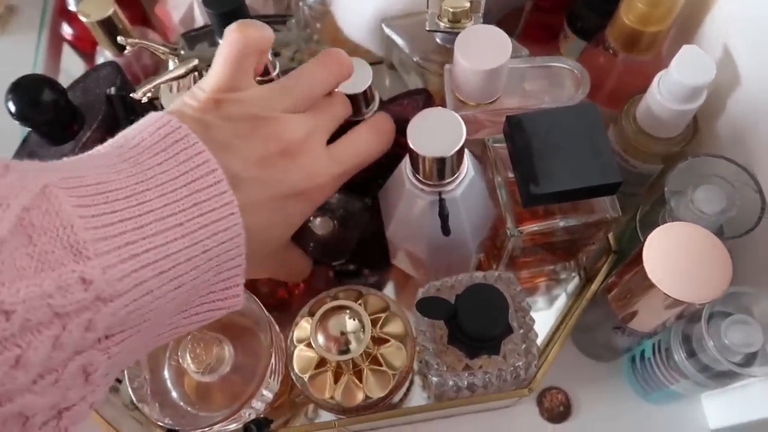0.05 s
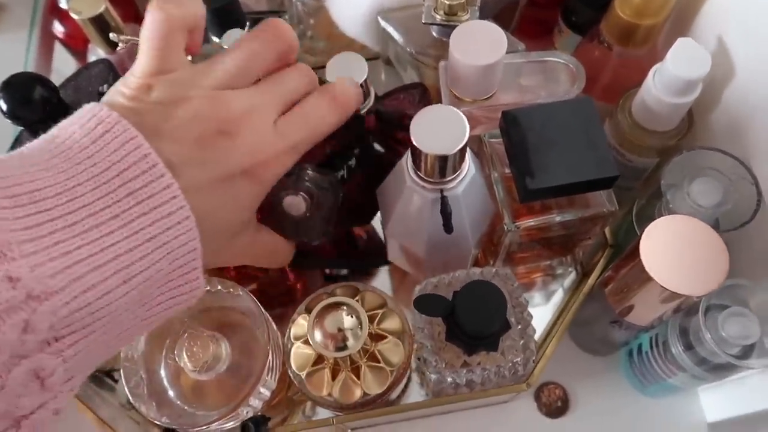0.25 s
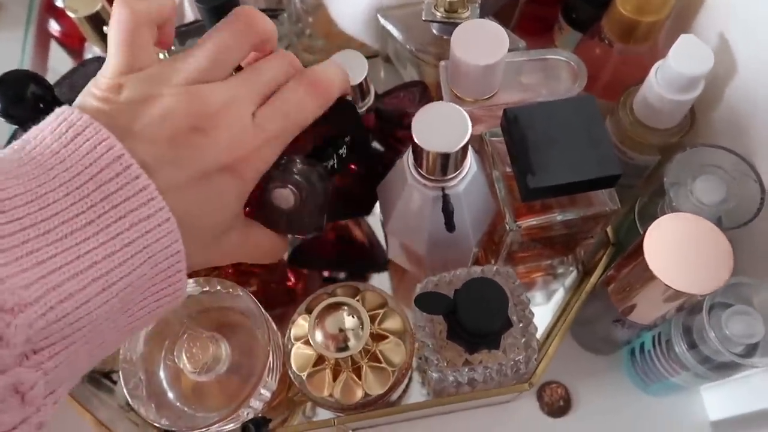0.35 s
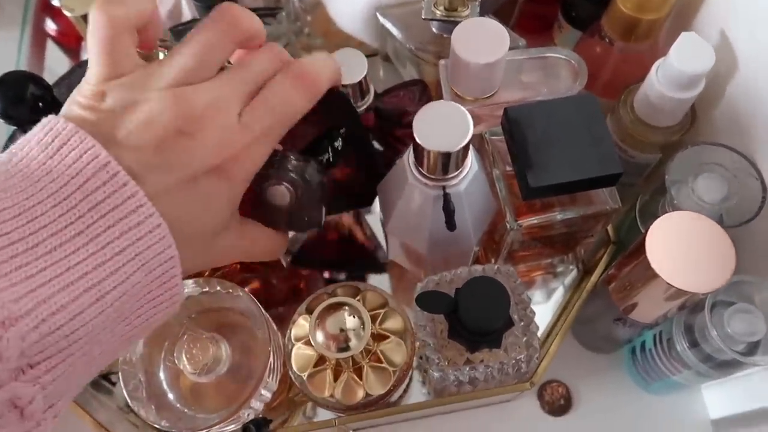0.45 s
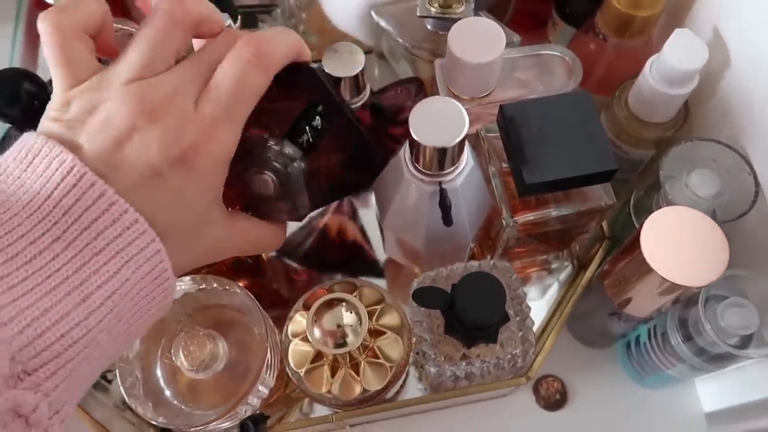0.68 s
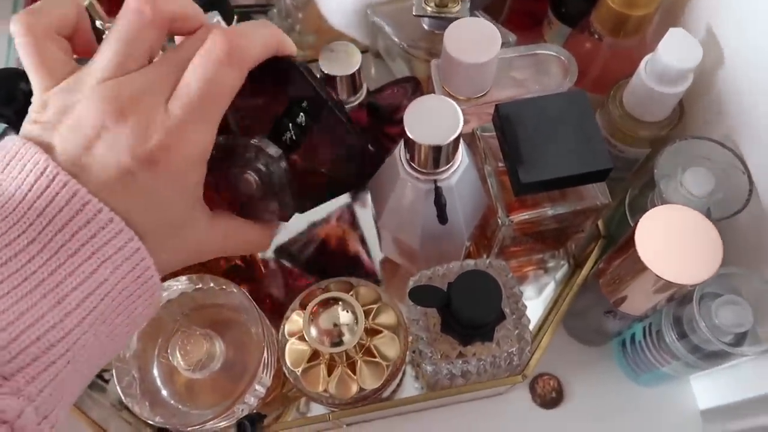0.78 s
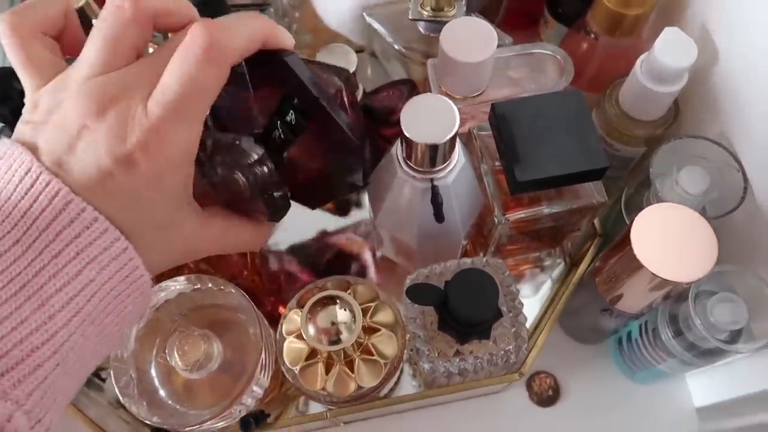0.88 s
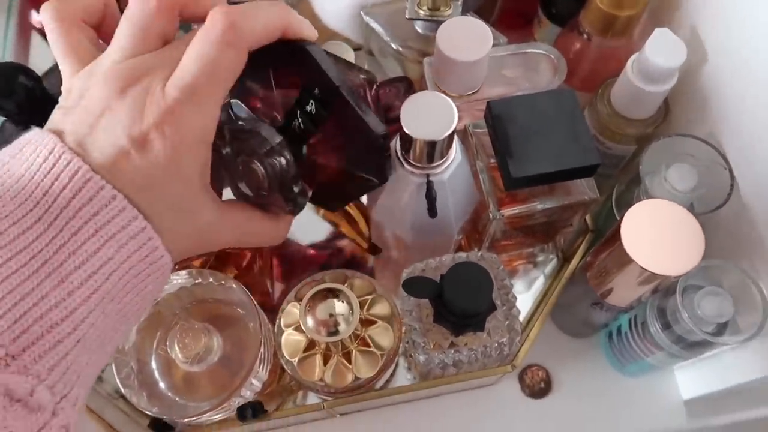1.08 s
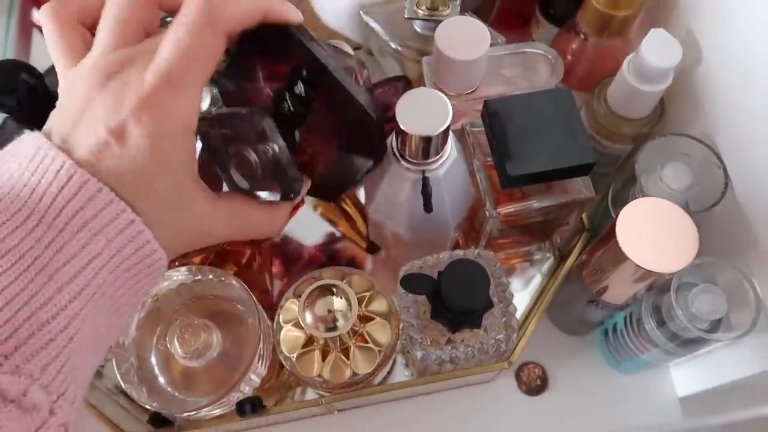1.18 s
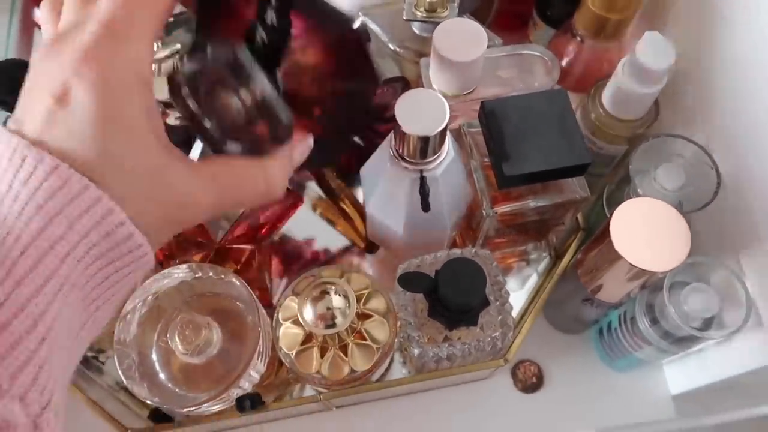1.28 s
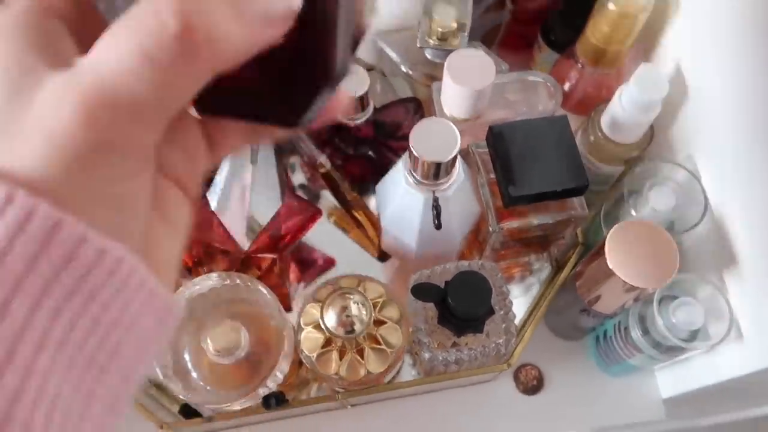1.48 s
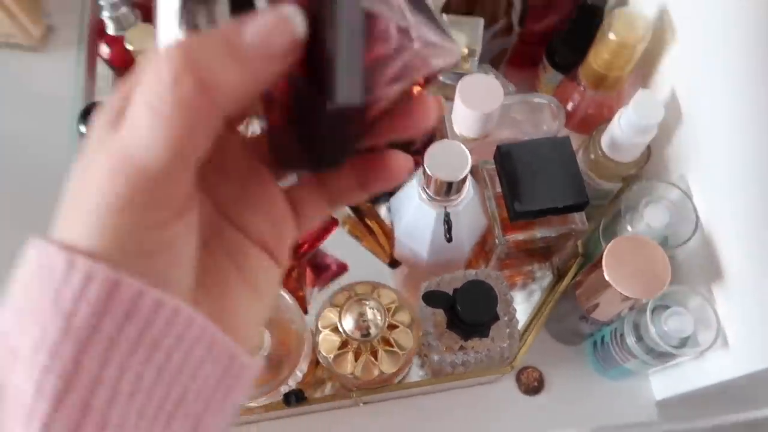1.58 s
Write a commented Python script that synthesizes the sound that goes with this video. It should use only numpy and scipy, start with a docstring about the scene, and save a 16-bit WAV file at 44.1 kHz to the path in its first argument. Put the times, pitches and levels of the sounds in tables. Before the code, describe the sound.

Close-up glass clinks and solid clacks come in irregular bursts as a bottle is pulled from among others, with low tray rumble and short sliding, then a short room tail and near quiet.

```python
"""Thick glass bottles knock together on a crowded glass tray, close to a small microphone in a bare room.
Each contact sums damped tray and bottle modes with a short noisy crack; some set thin high glass tones ringing.
Coloured noise makes the bottles' uneven slide, the low tray rumble, a wavering hum and the room air.
Contacts and glass tones excite noise-made room tails; the microphone thins the bass and rounds off peaks."""
import sys
import numpy as np
from scipy import signal
from scipy.fft import rfft, irfft, next_fast_len
from scipy.io import wavfile
from scipy.ndimage import map_coordinates

SR = 44100
rng = np.random.default_rng(int(sys.argv[2]) if len(sys.argv) > 2 else 0)


def transcribe(u):
    """Save the signal u as a 16-bit wav file named by the first command-line argument.

    u: samples, shape (n,) or (channels, n), limited to [-1, 1]; the rate is SR.
    q: integer samples, one column per channel.
    """
    v = np.clip(np.atleast_2d(u).T, -1, 1)
    q = np.round(v * 32767).astype(np.int16)
    wavfile.write(sys.argv[1], SR, q)


N = 72765  # samples, 1.65 s


def amp(db):
    """dB to gain."""
    return 10 ** (np.asarray(db) / 20)


def unit(x):
    """Scaled to rms 1."""
    return x / np.sqrt(np.mean(x ** 2) + 1e-20)


def along(points, hz):
    """Values of (f/Hz, value) points, read along a log frequency axis."""
    f, v = np.transpose(points)
    return np.interp(np.log(hz + 1), np.log(f + 1), v)


def curve(rows):
    """A (t/s, level/dB) table as a gain per sample, dying away within 50 ms of its end."""
    s, db = np.transpose(rows)
    times = [*s, s[-1] + .05]
    return amp(np.interp(np.arange(N) / SR, times, [*db, -120]))


def filtered(x, response):
    """x with its spectrum multiplied by a response of frequency."""
    m = next_fast_len(x.shape[-1] + SR // 4)
    spectrum = rfft(x, m) * response(np.fft.rfftfreq(m, 1 / SR))
    return irfft(spectrum, m)[..., :x.shape[-1]]


def low_cut(x, corner_hz):
    """Second-order bass loss below a corner."""
    return filtered(x, lambda hz: (1j * hz / (corner_hz + 1j * hz)) ** 2)


# Diffuse sound at the microphone: f/Hz, left-right likeness (1 = identical)
LIKENESS = [(40, .94), (100, 1), (500, 1), (1500, 0.99), (3000, 0.9), (6000, .3), (12000, .05)]


def spread(pair):
    """Two unrelated signals mixed to a left and right that agree at low frequencies and part in the treble."""
    def mid_side_gains(hz):
        turn = np.arccos(np.clip(along(LIKENESS, hz), -1, 1)) / 2
        return np.array([np.cos(turn), np.sin(turn)])

    mid, side = filtered(pair, mid_side_gains)
    return np.array([mid + side, mid - side])


def hiss(spectrum):
    """Stereo noise of rms 1 with a given colour, fading out below its lowest point."""
    shut = [(spectrum[0][0] / 2, -70), *spectrum]
    noise = rng.standard_normal((2, N))
    return unit(spread(filtered(noise, lambda hz: amp(along(shut, hz)))))


def ring(hz, db, t60, t):
    """Damped modes of alternating sign, struck once."""
    hz, db, t60 = np.array([hz, db, t60])[:, :, None]
    sign = (-1) ** np.arange(len(hz))[:, None]
    return np.sum(sign * amp(db - 60 * t / t60) * np.sin(2 * np.pi * hz * t), axis=0)


# Bottles sliding, before lift and unevenness: t/s, level/dB
SLIDE_LEVEL = [(0.0, -41.5), (0.282, -46.5), (0.476, -39.5), (0.718, -56.5), (0.87, -41.5), (0.96, -36),
               (1.04, -34)]
# Colour of the scrape: f/Hz, relative level/dB
SLIDE_COLOUR = [(88, -40), (150, -7.5), (505, -6), (687, -2), (991, -3), (1770, -5), (5510, -27.5),
                (11700, -38), (15000, -69)]
SLIDE_LIFT_DB, GRIT_DB = 0.5, 3.5  # over the level curve; strength of the unevenness


def slide():
    """Bottle feet scraping over the tray, their noise varied by a smooth random grit of 200 points a second."""
    grit = map_coordinates(rng.standard_normal(400), [np.arange(N) * 200 / SR])
    return amp(SLIDE_LIFT_DB + GRIT_DB * grit) * curve(SLIDE_LEVEL) * hiss(SLIDE_COLOUR)


# Tray rumble: t/s, level/dB
RUMBLE_LEVEL = [(0.0, -43), (0.064, -46.5), (0.128, -57), (0.362, -40), (0.496, -41.5), (0.574, -35),
                (0.72, -51), (0.758, -37), (0.798, -48.5), (0.882, -55.5), (0.922, -29.5), (1.01, -48),
                (1.046, -37), (1.09, -47), (1.172, -50), (1.406, -67.5), (1.65, -63)]
# Colour of the rumble: f/Hz, relative level/dB
RUMBLE_COLOUR = [(22, -9), (40, -13), (60, -17.5), (100, 0.4), (130, 1.5), (180, -2), (250, -8), (500, -54)]


def tray_rumble():
    """Low noise of the tray, swelling and sinking."""
    return curve(RUMBLE_LEVEL) * hiss(RUMBLE_COLOUR)


# Low wavering hum: t/s, level/dB
HUM_LEVEL = [(0.0, -33.5), (0.032, -52), (0.16, -51), (0.202, -42.5), (0.234, -48.5), (0.266, -28),
             (0.298, -54), (0.458, -40), (0.472, -53), (0.578, -34.5), (0.62, -64), (0.844, -61),
             (0.914, -53), (1.158, -64), (1.216, -57), (1.442, -62), (1.498, -50), (1.65, -54)]
# Colour of the hum, a narrow band: f/Hz, relative level/dB
HUM_COLOUR = [(50, -24), (64, -11), (72, -2.5), (80, -19), (100, -28.5), (200, -71)]


def hum():
    """A narrow band of low noise, which wavers like an unsteady tone."""
    return curve(HUM_LEVEL) * hiss(HUM_COLOUR)


# Colour of the room air: f/Hz, relative level/dB
AIR_COLOUR = [(120, -26), (200, -11), (400, -16), (1000, -20.5), (2500, -26), (5000, -31.5), (12000, -41)]
AIR_DB = -69


def room_air():
    """Steady faint noise, falling off towards the treble."""
    return amp(AIR_DB) * hiss([*AIR_COLOUR, (14000, -71.5)])


# Contacts, and a few early reflections some 10 ms after a hit: t/s, level/dB, ten colour levels/dB at COLOUR_HZ,
# rise time constant/ms, ring length as a factor on the mode and crack decays (under 1 shorter, over 1 longer)
KNOCKS = [(0.045, -25, -20, 2.5, -22, -15.5, -8, -14, -30.5, -14.5, -16, -43.5, 1.1, .9),
          (0.096, -20.5, -32.5, -19, -16.5, -23, -2.5, -11, -7, -20, -33, -44, 0.83, 1.2),
          (0.16, -18, -43.5, -14, -30.5, -18, -10.5, -12.5, -6, -10, -46.5, -61, 1.6, 1.2),
          (0.205, -30.5, -24, -32.5, -5, -8, -12, -2, 0, -5.5, -17.5, -29.5, 2.2, .7),
          (0.229, -10, -42, -26, -19.5, -5, -1.5, -16.5, -14.5, -20, -38.5, -51, 2.1, .7),
          (0.238, -18, -15, -11.5, -21.5, -19, -17.5, -36.5, -29, -14, -29, -49.5, 2.7, .9),
          (0.274, -19.5, -28.5, -19.5, -21.5, -17, -10.5, -12, -10.5, -21, -27, -34, 1.5, .9),
          (0.287, -29, -32.5, -34.5, -23, -14, -5.5, -20.5, -6.5, -3.5, -27, -42, 2.1, .9),
          (0.303, -8.5, -41, -28.5, -27.5, -4, -5.5, -15, -8.5, -15.5, -30.5, -50.5, 1.5, .9),
          (0.311, -6.5, -22, -8, -20.5, -15.5, -7.5, -8.5, -12.5, -13, -33, -43, 8, .9),
          (0.319, -21.5, -26.5, -20, -24.5, -17, -0.5, -13, -12, -16, -30.5, -42, 1.3, .9),
          (0.336, -9.5, -21.5, -11, -20.5, -6, -10.5, -13, -16.5, -16.5, -31, -41, 3.2, .9),
          (0.354, -3.5, -22.5, -15, -19.5, -13, -16.5, -9, -8.5, -13, -24.5, -39.5, 2.3, .9),
          (0.366, -12, -38, -28, -15.5, 5.5, -11, -6, -30.5, -30, -39, -46.5, 2, .9),
          (0.437, -13, -23.5, -16, -17, -17.5, -10, -21.5, -17, -21.5, -34.5, -54, 0.64, .9),
          (0.5135, -7, -36, -14, -11, -14, -6, -15, -8, -14, -21.5, -34.5, 3.1, 1.1),
          (0.52, -4, -33, -33, -27.5, -9, -16, -9, -8, -17.5, -31.5, -42, 2.9, .9),
          (0.531, -9, -3, -11, -16, -5.5, -12.5, -19, -10.5, -16.5, -32.5, -38, 1.2, .9),
          (0.547, -17.5, -21.5, -4.5, -5, 2.5, -8, -6.5, -11.5, -14.5, -17.5, -33.5, 3.5, 1.1),
          (0.567, -12.5, -31.5, -17.5, -9, -15, -15.5, -7, -1, -4, -26.5, -33.5, 2, .9),
          (0.571, 2.5, -33, -6, -6.5, -2, -16.5, -6, -13, -20, -19, -35.5, 0.2, .7),
          (0.58, -5.5, -35, -24, -24.5, -8, -8.5, -22, -16.5, -23, -37.5, -46, 0.62, .8),
          (0.729, -21.5, -28.5, -7, -16, -18.5, -3.5, -11, -8, -7, -16.5, -26.5, 4.3, 1.1),
          (0.749, -3, -41, -13, -12, -4.5, -18.5, -12, -9, -16.5, -27, -40, 4.9, .9),
          (0.806, -26, -26.5, -29, -22, -1.5, -20, -23, -24, -25.5, -41, -49.5, 3.5, 1.3),
          (0.891, -18, -32.5, -30.5, -25.5, -24, -22.5, -14, 7, -10, -20, -30, 1.1, .7),
          (0.908, -10, -28, -20.5, -23, -9.5, -1.5, -8.5, -3, -12.5, -20.5, -31, 6.5, 1.2),
          (0.9235, 2, -26, -10, -13.5, -9, -18, -9.5, -14.5, -15.5, -28, -39.5, 0.66, .7),
          (0.931, -9, -31, -22, -25, -9, -16, -6.5, -12, -17, -23, -36, 1.7, 1.1),
          (0.941, -13, -24, -21, -14, -16.5, -15.5, -5, -9.5, -15, -18, -33.5, 1.1, .9),
          (0.949, -17, -22.5, -24.5, -27, -18, -16, -13.5, -9, -16, -24.5, -38, .6, .6),
          (0.997, -18, -32.5, -27, -25.5, -20.5, -14, -8.5, -13, -27, -17.5, -40, 1.6, .9),
          (1.014, -27, -0.5, -14.5, -4.5, -6.5, -8, 10.5, 7, -2.5, -11.5, -20.5, 1.2, 1.2),
          (1.038, -15.5, -33, -23, -30.5, -10.5, -12.5, -10, -14.5, -11, -16, -21.5, 1, 1.1),
          (1.0435, 3.5, -18, -6, -5.5, -12, -7.5, -8.5, -8.5, -18, -20, -27.5, 0.39, .7),
          (1.0525, -6, -29, -20, -25, 0, -19, -23.5, -16.5, -17, -21.5, -27, 0.87, .9),
          (1.16, -22.5, -25.5, -14, -33, -18, -26, -6, -14.5, -16, -29, -51, 2.4, .9)]
# Where the colour levels sit: f/Hz
COLOUR_HZ = [190, 350, 530, 680, 830, 1300, 2000, 3200, 5500, 10000]
# Modes of tray and heavy bottles, before each row's colour and ring factor: f/Hz, level/dB, t60/s
BODY = [(230.8, -21.5, 0.0073), (314, 2.5, 0.019), (391.7, 7, 0.027), (497, 9, 0.02), (587, 3.5, 0.016),
        (707, -2, 0.048), (837.5, 6.5, 0.027), (960, -14, 0.0053), (1111, -1, 0.0073), (1211, 5, 0.02),
        (1372, 1, 0.016), (1667, -1, .022), (1926, -4.5, 0.04), (2190, 2, 0.016), (2520, -9.5, 0.026),
        (2767, -10, 0.054), (3030, 4, 0.021), (3740, -4, 0.03), (4263, -3.5, 0.03), (5060, -2, 0.015)]
SCATTER_DB, DETUNE = 1.5, .012  # random spread of each mode's level, and of its pitch as a fraction
CRACK_DB, CRACK_T60 = 7, 0.042  # noisy burst over the colour; its decay in s before the ring factor
CRACK_TILT_DB = 4.5  # brightening of the burst, nearing this much an octave well over 1 kHz
TREBLE_FALL_DB = -22.5  # at 16 kHz, under the 10 kHz colour
TRAY_DB = 40  # the whole tray shakes at each contact and fills the room evenly
BOTTLE_LOW_HZ = 110  # small bottles send out little below this


def knocks():
    """Each row rings the body modes and bursts into a noisy crack nearby, and sends a broad jolt to the room."""
    near, jolts = np.zeros(N + SR), np.zeros(N + SR)
    t = np.arange(SR // 10) / SR
    mode_hz, mode_db, t60 = np.transpose(BODY)
    impulse = np.arange(len(t)) == SR // 200  # 5 ms in
    for s, db, *colour, rise_ms, ring_factor in KNOCKS:
        start = round(s * SR)
        rise = 1 - np.exp(-1000 * t / max(rise_ms, .1))
        points = [(60, colour[0] - 40), *zip(COLOUR_HZ, colour), (16000, colour[-1] + TREBLE_FALL_DB)]

        def tint(hz):  # the colour, tilted down towards 3 dB an octave
            return amp(along(points, hz)) * np.sqrt(1000 / (hz + 100))

        def crack_colour(hz):
            return amp(CRACK_DB + CRACK_TILT_DB * np.log2(1 + hz / 1000)) * tint(hz)

        louder, higher = rng.standard_normal((2, len(BODY)))
        pitch = mode_hz * (1 + DETUNE * higher)
        level = mode_db + along(points, pitch) + SCATTER_DB * louder
        body = rise * ring(pitch, level, ring_factor * t60, t)
        burst = rise * amp(-60 * t / (ring_factor * CRACK_T60)) * rng.standard_normal(len(t))
        crack = filtered(burst, crack_colour)
        near[start:][:len(t)] += amp(db) * (body + crack)
        jolts[start:][:len(t)] += amp(db + TRAY_DB) * filtered(impulse, tint)
    return low_cut(near[:N], BOTTLE_LOW_HZ), jolts[:N]


# Side signal of the near sound: f/Hz, level under the mid/dB
CONTACT_SIDE = [(300, -25), (1000, -27), (3000, -11.5), (6000, -2.5), (12000, 3.5)]
SIDE_SMEAR_S, LEAN_DB = 0.0065, -0.5  # decay of the scatter; treble gain of the left, with the right opposite


def stereo(x):
    """Centred bass, treble scattered differently to each port by a random smear drawn afresh every 40 ms."""
    t, side, step = np.arange(SR // 50) / SR, np.zeros(N + SR), SR // 25
    for i in range(0, N, step):
        smear = rng.standard_normal(len(t)) * np.exp(-t / SIDE_SMEAR_S)
        part = signal.fftconvolve(x[i:i + step], smear / np.linalg.norm(smear))
        side[i:i + len(part)] += part
    side = filtered(side[:N], lambda hz: amp(along(CONTACT_SIDE, hz)))
    lean = lambda hz: amp(np.outer([1, -1], along([(1000, 0), (3000, LEAN_DB)], hz)))
    return filtered(np.array([x + side, x - side]), lean)


# Decay of the bare room: f/Hz, t60/s
ROOM_T60 = [(100, 0.83), (300, 0.29), (800, 0.64), (2000, 0.53), (5000, 0.45), (8000, 0.35), (11000, 0.1)]
# Colour of its answer, before the overall room level: f/Hz, level/dB
ROOM_COLOUR = [(100, -1.8), (300, -7.5), (800, -7), (2000, -7.5), (5000, -8.5), (10000, -3.5)]
ROOM_DB, NEAR_IN_ROOM_DB = -6.5, -8  # the whole answer; the near knocks sent into it


def room(x):
    """Each sixth of a second gets a freshly drawn noise tail, with its own decay at each frequency."""
    out, step = np.zeros((2, N + 2 * SR)), SR // 6
    for i in range(0, N, step):
        hz, t, z = signal.stft(rng.standard_normal((2, SR)), SR, nperseg=256)
        t60 = along(ROOM_T60, hz)[:, None]
        z = z * amp(-60 * t / t60) * (1 - np.exp(-t / 0.0011))  # soft onset
        z = z * amp(along(ROOM_COLOUR, hz) + ROOM_DB)[:, None] / np.sqrt(t60)
        tail = spread(signal.istft(z, SR, nperseg=256)[1]) * np.sqrt(6 * np.log(10) / SR)
        wet = signal.fftconvolve(x[None, i:i + step], tail, axes=1)
        out[:, i:i + wet.shape[1]] += wet
    return out[:, :N]


# Contacts that set the thin glass ringing: t/s, level/dB, then level/dB of each of the five GLASS modes under it
CLINKS = [(0.2708, -34, -17.5, -27, -14.5, -39, -37), (0.3052, -47, -5.5, -28.5, -20, -33, -30),
          (0.511, -32.5, -27.5, -21.5, -28.5, -32, -45), (0.5699, -25, -26.5, -29.5, -31.5, -31, -24),
          (0.7286, -35.5, -19.5, -25, -15, -50, -55), (0.749, -31, -24.5, -24, -13.5, -11.5, -84),
          (1.042, -14, -29.5, -26, -27, -40, -31)]
# Thin glass walls: f/Hz, t60/s
GLASS = [(9275, .15), (10250, .1), (11060, .1), (12160, .14), (14830, .06)]
CLINK_RISE_S, SHIMMER_HZ = 0.0022, 30  # rise time constant; random spread of each mode's pitch


def clinks():
    """High, thin glass tones after some contacts; each mode is a close pair, which beats."""
    out, t = np.zeros(N + SR), np.arange(SR // 4) / SR
    hz, t60 = np.transpose(GLASS)
    for s, db, *levels in CLINKS:
        pair = sum(ring(hz + SHIMMER_HZ * rng.standard_normal(len(hz)), levels, t60, t) for _ in range(2))
        out[round(s * SR):][:len(t)] += amp(db) * (1 - np.exp(-t / CLINK_RISE_S)) * pair
    return out[:N]


def scene():
    """Contacts and glass tones close by, their room, the sliding, the rumble, the hum and the air."""
    near, jolts = knocks()
    glass = clinks()
    wet = room(jolts + amp(NEAR_IN_ROOM_DB) * near + glass)
    return stereo(near + glass) + wet + slide() + tray_rumble() + hum() + room_air()


MIC_LOW_HZ, TOP_HZ = 51.16, 15980  # bass corner; band limit
CEILING, KNEE = 1.0, 5  # level the peaks cannot pass; a higher knee bends later


def record(dry):
    """A small microphone thins the deep bass, the loudest knocks clip softly, the band limit cuts the top."""
    dry = low_cut(dry, MIC_LOW_HZ)
    clipped = dry / (1 + np.abs(dry / CEILING) ** KNEE) ** (1 / KNEE)
    return filtered(clipped, lambda hz: hz < TOP_HZ)


dry = scene()
out = record(dry)
transcribe(out)
```